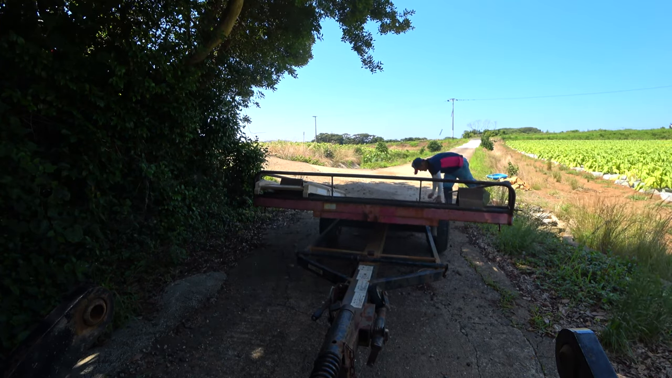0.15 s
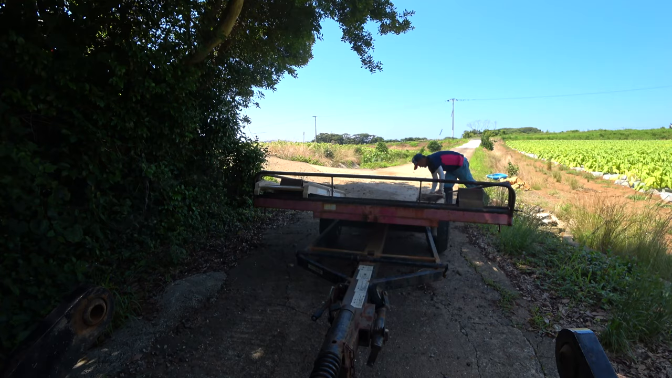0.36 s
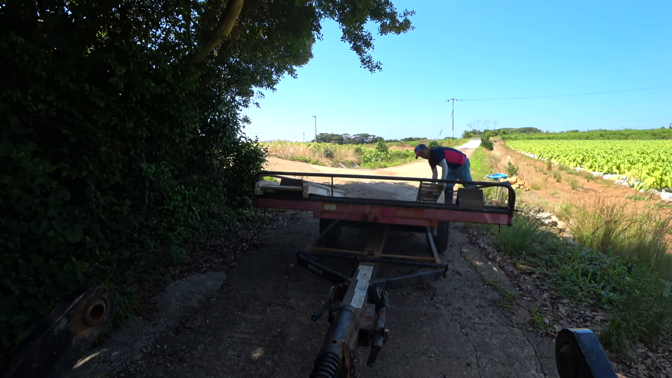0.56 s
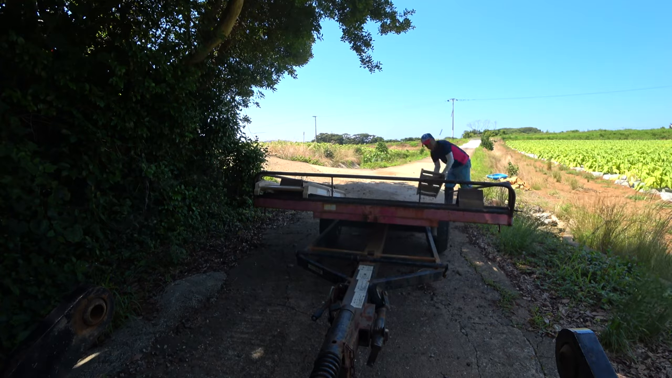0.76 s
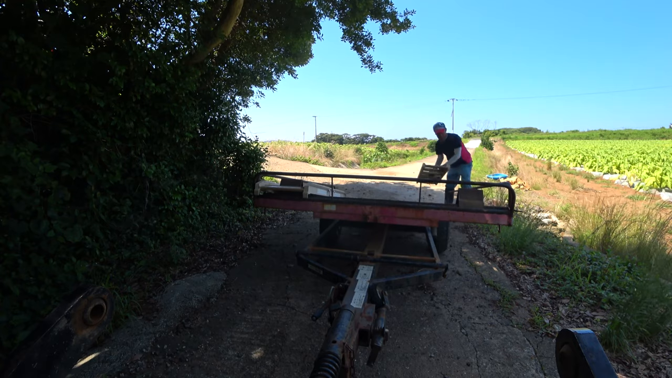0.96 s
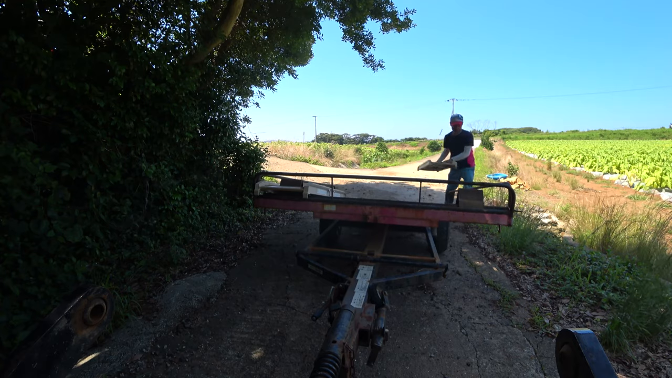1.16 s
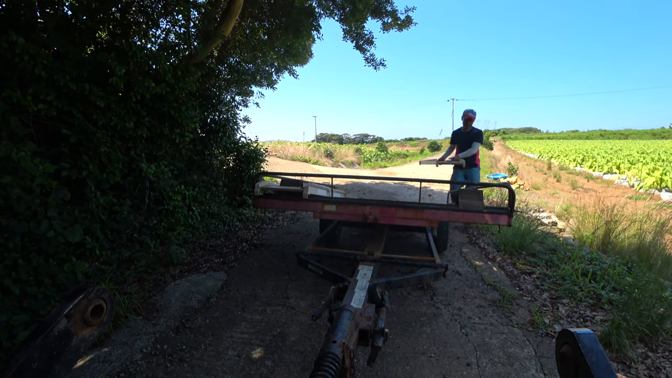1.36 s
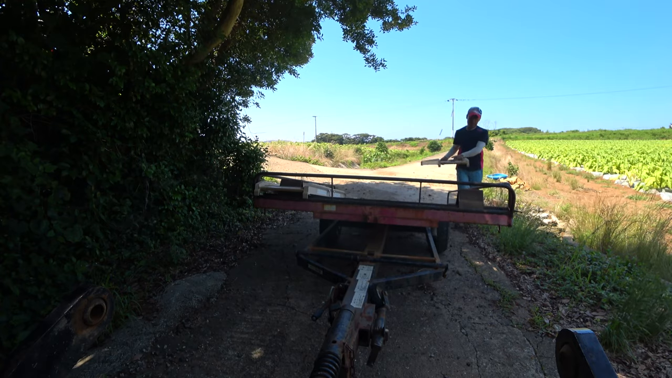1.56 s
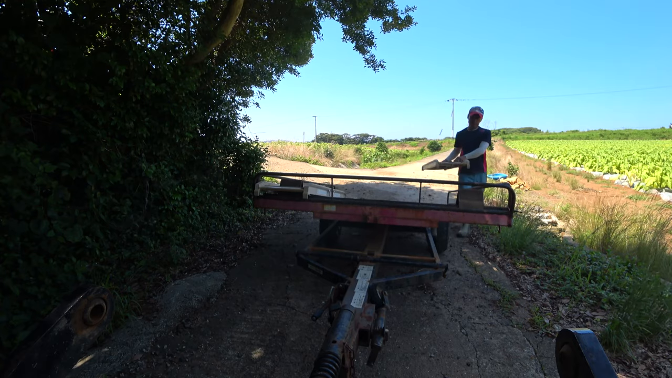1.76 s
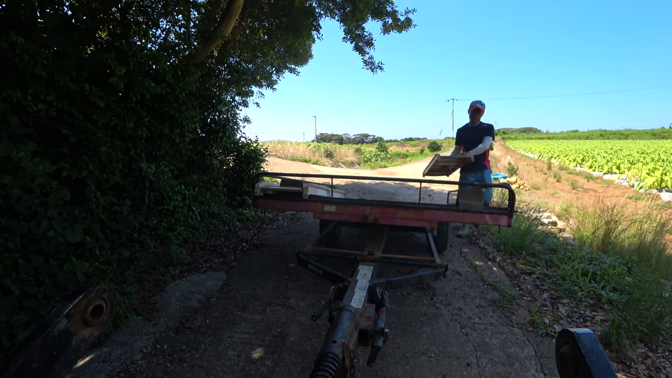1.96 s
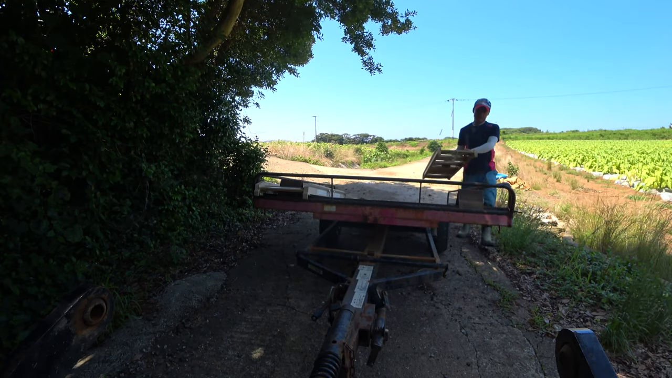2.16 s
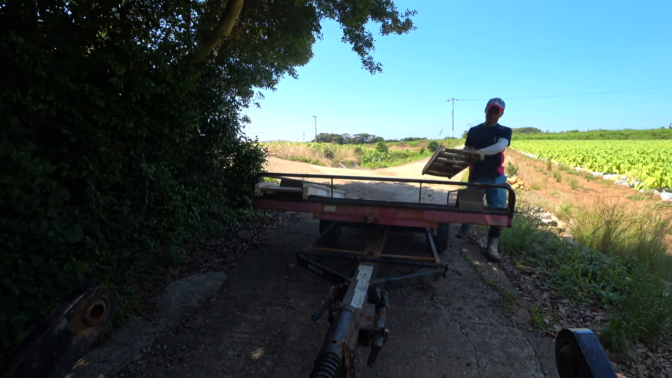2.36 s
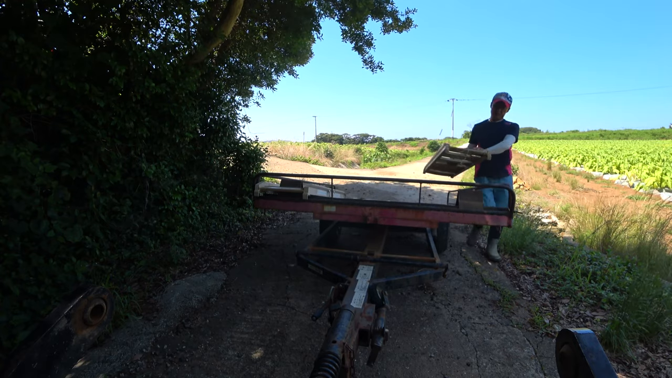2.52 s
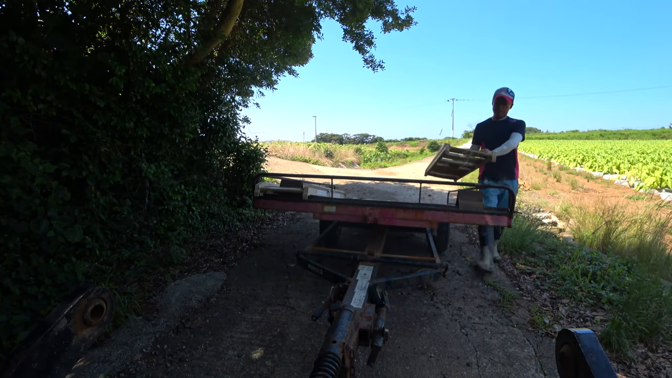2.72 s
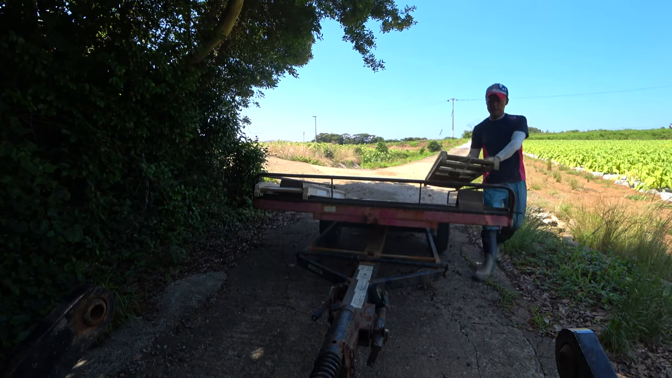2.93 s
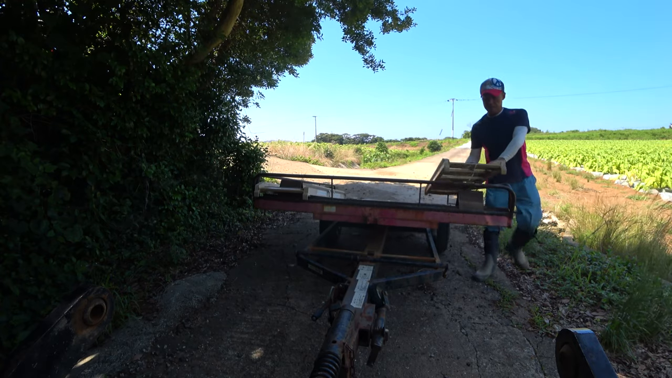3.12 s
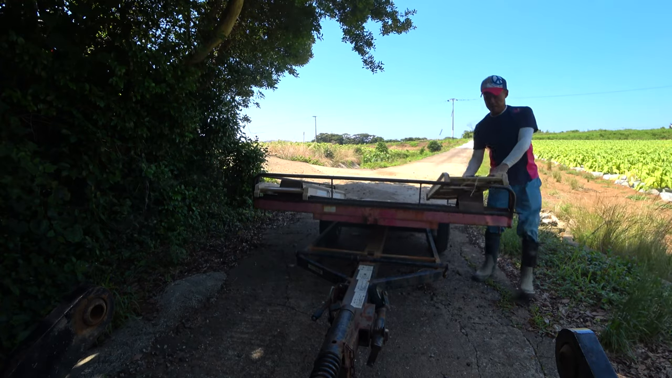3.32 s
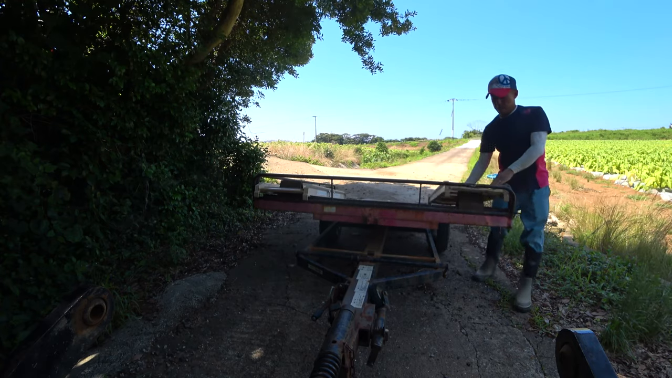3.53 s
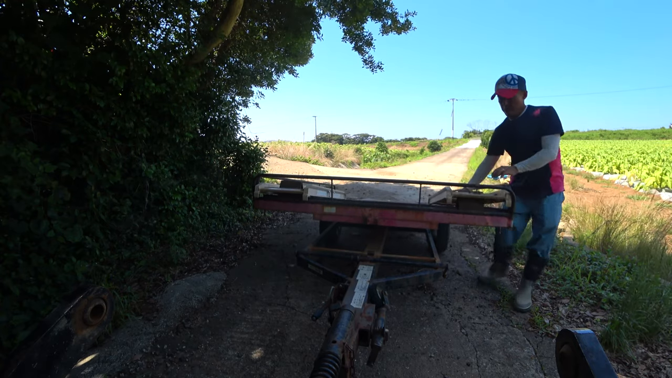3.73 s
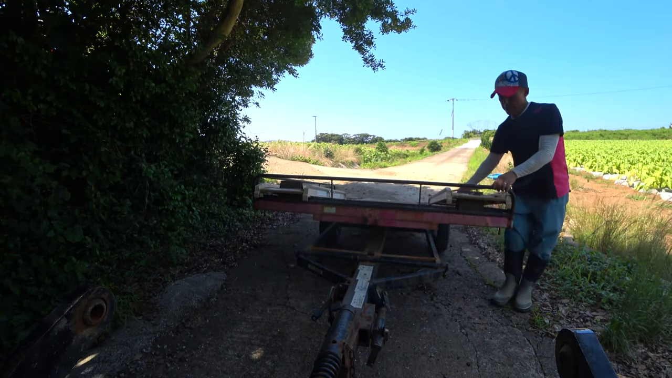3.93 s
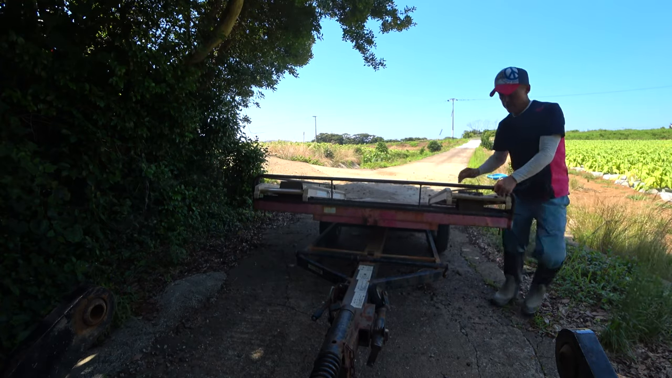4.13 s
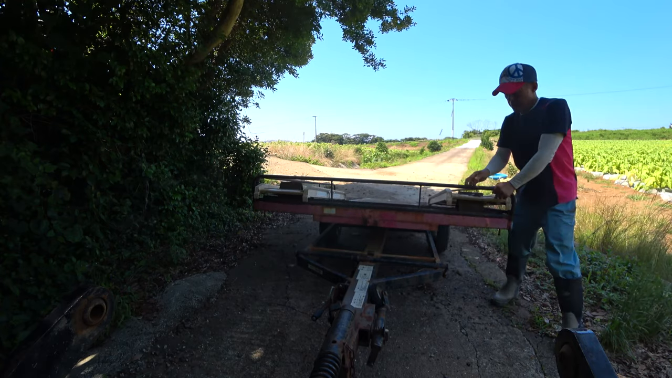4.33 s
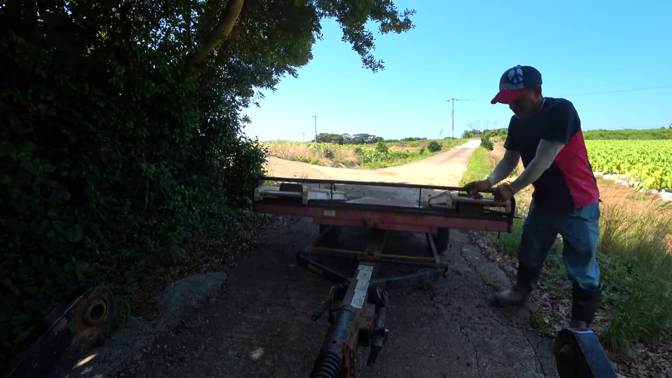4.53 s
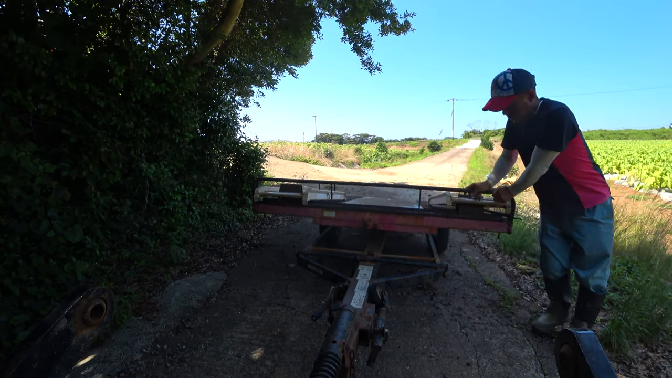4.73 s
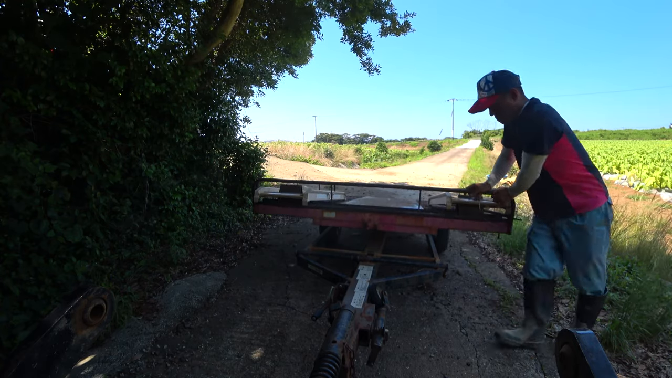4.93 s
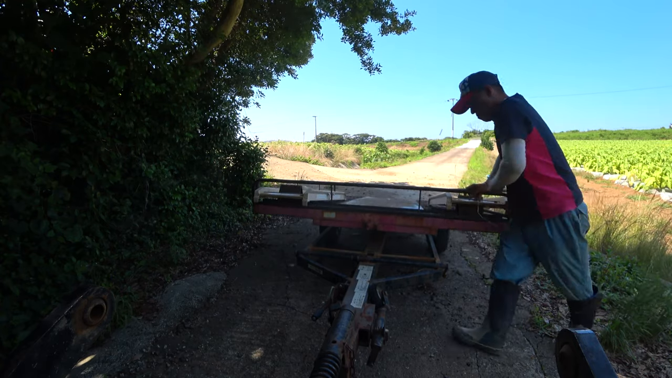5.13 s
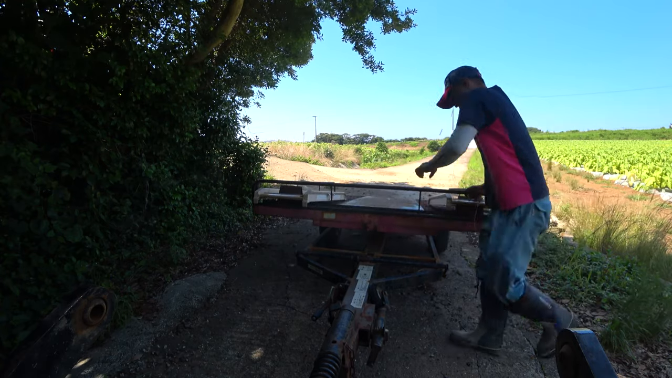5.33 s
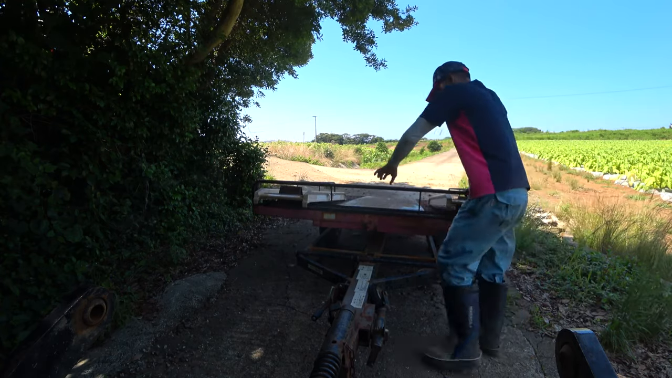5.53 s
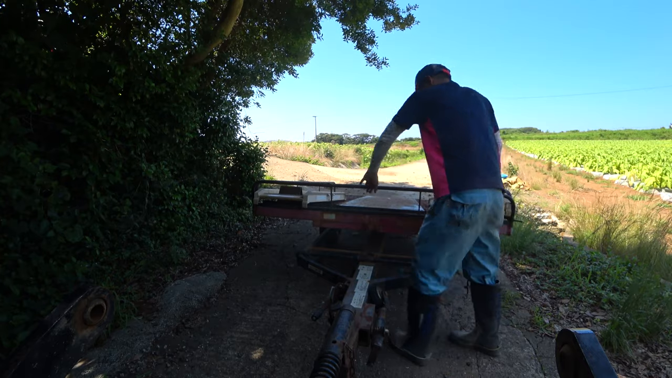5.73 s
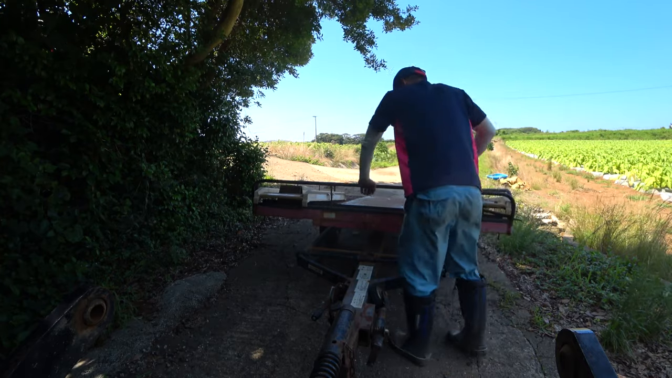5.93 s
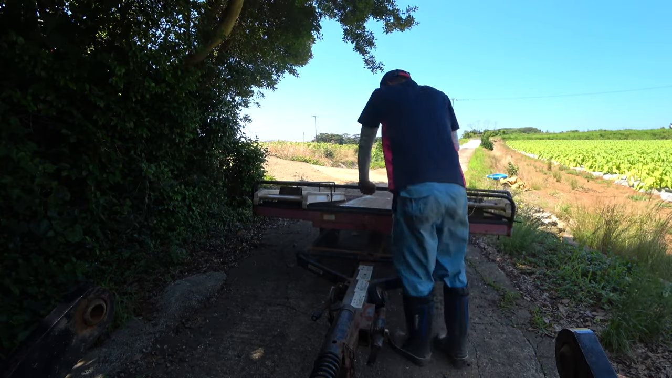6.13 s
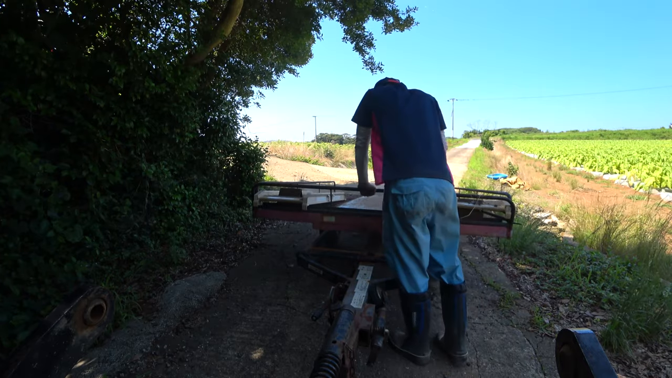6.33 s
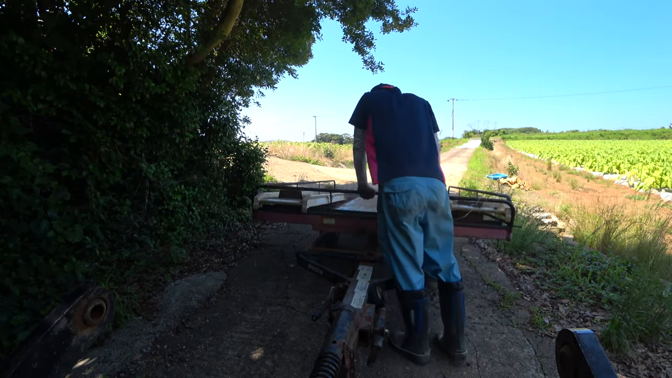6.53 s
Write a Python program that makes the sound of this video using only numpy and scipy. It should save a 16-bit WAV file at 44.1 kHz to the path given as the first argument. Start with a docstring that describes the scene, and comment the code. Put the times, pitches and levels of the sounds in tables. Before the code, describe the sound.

A stereo outdoor microphone by a trailer picks up airy hush and rustling leaves. Wood knocks dully, then clacks hard twice before boots come crunching closer. In the middle a loose pallet lands in a rapid, very loud rattle of blows, booming and cracking on steel with a metallic tail. Afterwards come close footsteps, twig snaps, small wood taps and low wind puffs.

```python
"""Outdoors by a trailer: a slatted wooden pallet is picked up, carried and thrown on the steel bed.
Wood and blows on steel are bursts of coloured noise whose pitches die at different speeds.
The bed rings on as decaying sine waves. Boots crunch leaves and grit in grainy noise bursts.
Behind it: airy noise, rustling leaves, a faint far whine (a sine) and wind pulses on the microphone."""
import sys
import numpy as np
from scipy import signal
from scipy.fft import rfft, irfft, next_fast_len
from scipy.io import wavfile
from scipy.ndimage import map_coordinates

SR = 44100
rng = np.random.default_rng(int(sys.argv[2]) if len(sys.argv) > 2 else 0)


def output_pcm(signal):
    """Save a mono or channel-first signal as 16-bit PCM at the path in sys.argv[1].

    Samples are clipped to [-1, 1] before scaling.
    """
    pcm = np.clip(np.atleast_2d(signal).T, -1, 1) * 32767
    wavfile.write(sys.argv[1], SR, np.round(pcm).astype(np.int16))


N = 289978  # length in samples

# Levels in the tables are before the trims that the functions add.
# Colours of noise. Each row: frequency in Hz, relative strength in dB per Hz.
# Open air, then the flutter of wind on the microphone:
AIR_COLOUR = [(25, -40), (60, -10), (100, -19), (170, -9.5), (290, -5.5), (420, 4), (700, -2.5), (1040, 1),
              (1400, -1), (2100, -0.5), (3500, -2.5), (6200, -6.5), (9000, -15.5), (12000, -20),
              (16000, -18)]
FLUTTER_COLOUR = [(25, -20), (70, 0), (160, 3.5), (400, -3.5), (800, -13), (2000, -37)]
# Dry leaves and coarse grit under a sole, then the snaps and the rustle:
LEAF_COLOUR = [(1500, -44), (4500, 7), (7500, 6.5), (9500, 1.5), (11500, 1.5), (16000, -12)]
STONE_COLOUR = [(300, -1), (1000, 1.5), (2000, 2), (4000, -2), (7000, -54)]
SNAP_COLOUR = [(300, -6.5), (1000, 0), (2500, 0.5), (4800, 4.5), (7500, 4.5), (9500, -0.5), (11500, 2),
               (16000, -17.5)]
# Hollow pallet frame and its hard edge:
FRAME_COLOUR = [(100, -34.5), (290, -32), (350, -7.5), (400, 0.5), (480, -10.5), (540, -10), (640, -21),
                (890, -10.5), (1100, -19.5), (1450, -17), (2000, -31.5), (5000, -58)]
EDGE_COLOUR = [(500, -4.5), (1200, -5), (2300, 8), (4000, 4), (8000, -11.5), (16000, -45)]
# Loose slat, its splintery top and the low ring of its thin board:
SLAT_COLOUR = [(200, -44), (500, -44), (750, -10.5), (1100, -9), (1350, -16), (1650, -15.5), (2050, -1.5),
               (2700, -1), (3500, 6), (4500, 3.5), (5600, 0.5), (8000, -14), (16000, -83)]
SPLINTER_COLOUR = [(2000, -30), (4500, 1.5), (7500, 0.5), (9500, -7), (11500, -8), (13000, -21),
                   (16000, -21)]
BOARD_COLOUR = [(500, -18), (750, -4), (1400, 0), (2200, -7), (3500, -15)]
# Boom and crack of a blow on the bed, and the wide steel plate it shakes:
BOOM_COLOUR = [(40, -47), (130, -52), (210, -19), (300, -37), (380, -1.5), (550, -1.5), (800, 5.5),
               (1150, 0), (1400, 5), (2200, -3), (3500, -23), (8000, -54)]
CRACK_COLOUR = [(800, -28), (2200, 5.5), (3000, 5), (4000, 4), (4900, 5.5), (5800, -1), (7400, -2),
                (8500, -8), (11500, -8.5), (13500, -21), (16000, -29)]
PLATE_COLOUR = [(40, -42), (110, -60), (200, -10), (290, -21), (400, 4), (620, -10.5), (830, -1),
                (1100, -9.5), (1350, 1.5), (2500, -21), (7000, -39), (16000, -39)]

# How fast each body goes quiet. Each row: frequency in Hz, time to fall by 60 dB in seconds.
FRAME_DECAY = [(400, 0.2), (1500, 0.26), (8000, .08)]
EDGE_DECAY = [(1500, 0.26), (8000, 0.032)]
SLAT_DECAY = [(1300, 0.34), (4000, 0.22), (12000, 0.19)]
BLOW_DECAY = [(400, 0.52), (1500, 0.25), (5000, 0.27), (12000, 0.35)]
PLATE_DECAY = [(200, 2.47), (450, 1.45), (1400, 0.74), (6000, 0.84)]

# Bending resonances of a slat. Each row: frequency in Hz, width in Hz, level in dB.
SLAT_MODES = [(1130, 14, -52), (1296, 7, 19), (1355, 140, 8), (2040, 620, 10.5), (2600, 67, 18),
              (3000, 50, -10)]
# Ringing pitches of the steel bed, then of the side rail.
# Each row: frequency in Hz, level in dB, time to fall by 60 dB in seconds.
BED_MODES = [(195, -40, 1.2), (219, -34, .8), (389, -12, .22), (463, -32, 1.1), (498, -24, .35),
             (603, -24, .3), (662, -26, .25), (769, -23, .3), (812, -25, .5), (943, -24, .4),
             (1055, -27, .25), (1335, -32, .45), (1379, -26, .25), (1587, -13, .15), (1811, -26, .15),
             (2015, -25, .2), (3222, -28, .15), (3833, -24, .15), (4770, -27, .15), (7498, -28, .15)]
RAIL_MODES = [(910, -32, 4.2), (6309, -20, .58), (6950, -41, .5), (10416, -25.5, .45), (11880, -30, .35)]

# Puffs of wind on the microphone. Each row: time in seconds, level in dB.
GUSTS = [(1.092, -51), (1.21, -53), (1.319, -28), (1.394, -36), (1.631, -45), (2.253, -38.5), (2.308, -35),
         (2.371, -20), (2.497, -22), (4.424, -30.5), (4.618, -24), (5.185, -21), (5.821, -31), (5.878, -38),
         (6.109, -29.5), (6.228, -23), (6.29, -14), (6.309, -6), (6.319, -7.5), (6.356, -17.5),
         (6.425, -23.5), (6.561, -28)]
# Footfalls. Each row: time of full weight in seconds, scuffing before it in seconds,
# rolling on after it in seconds, level in dB, coarse grit relative to the leaves in dB.
STEPS = [(2.457, .1, .03, -10.5, -2.5), (2.995, 0, 0, -13.5, -15), (3.055, 0, .02, -8.5, -28),
         (3.565, .075, 0, -12.5, -6), (4.177, 0, .03, -16.5, 1.5), (4.287, 0, 0, -17, -6),
         (4.426, 0, .09, -5, -4), (4.579, 0, .06, -8, -11), (5.167, 0, .03, -14, -2),
         (5.39, 0, 0, -27.5, 2), (5.664, 0, 0, -23, 6), (5.692, 0, .08, -15.5, 0), (5.855, 0, 0, -14, -5),
         (6.128, 0, .03, -14, 1.5)]
# Single twigs and stones snapping. Each row: time in seconds, level in dB.
SNAPS = [(1.8951, -7.5), (2.149, -18.5), (2.458, -21), (2.87, -10.5), (2.8865, -12), (2.9796, -9.5),
         (2.998, -20), (3.043, -13.5), (3.0771, -15.5), (4.1006, -14), (4.56, -17), (4.579, -2.5),
         (4.632, -9), (4.726, -14.5), (4.798, -9.5), (4.8727, -16.5), (5.1295, -16), (5.145, -21),
         (5.1991, -7.5), (5.667, -7.5), (5.6717, -13.5), (5.694, -10), (5.7469, -9.5), (5.7677, -10.5),
         (6.0324, -18.5), (6.062, -20), (6.2735, -27)]
# Knocks of the frame. Each row: start in seconds, level in dB, edge relative to the knock in dB.
KNOCKS = [(0.253, -27.5, -6), (0.282, -24, -1.5), (0.505, -25.5, -29), (0.562, -22, -14), (1.601, -42, -8),
          (1.797, -31, 4), (1.894, -34, 6), (2.143, -39, 4), (2.837, -24, 8), (2.87, -28.5, 12.5),
          (4.1, -25.5, 5), (4.929, -33.5, -31), (5.13, -20, 0), (5.175, -23.5, 6.5), (5.695, -31, 8),
          (5.767, -27.5, -8), (5.813, -28, -5)]
# Clacks of loose slats. Each row: start in seconds, level in dB,
# sharpness in dB (edge-on above 0, flat below), rise in seconds.
SLAT_CLACKS = [(0.895, -24.5, 1, 0.00071), (0.944, -23, 4, .0015), (1.089, -19, 13, 0.00087),
               (1.132, -17, 4, 0.0025), (1.157, -19.5, 12, 0.0018), (1.253, -26, 3, .003),
               (1.67, 3, 11.5, 0.011), (1.798, -15.5, 4, .003), (1.819, -8.5, 7.5, 0.0044),
               (1.896, -8.5, 0, 0.011), (1.965, -1.5, 1.5, 0.0012), (2.749, -26, -12, 0.01),
               (2.838, -18, 21, 0.0094), (3.177, -31.5, -7.5, 0.0015), (5.129, -13.5, -5, 0.002),
               (5.319, -31, -6.5, 0.00073), (5.582, -29, -7.5, 0.0015), (5.697, -28.5, -9, .003),
               (5.765, -22, -1, .004), (5.936, -22, -3, 0.0026), (6.122, -20, -7, 0.014),
               (6.273, -22.5, -4.5, 0.00042)]
# Landings of the pallet. Each row: start in seconds, length of juddering in seconds,
# time between blows in seconds, level in dB, crack relative to the blow in dB, push into the steel in dB.
LANDINGS = [(3.584, 0.057, 0.012, -2, -3, -7), (3.667, 0.17, .024, -2.5, 2, -5),
            (3.845, 0.097, .024, -2.5, 0, -16.5)]

WHINE_DB = -57
RUSTLE_GRAIN_DB = 4  # size scatter of the grains in rustling leaves
# Stirred leaves: level under a footfall, time to settle in seconds, level between steps
STIR_DB, STIR_S, IDLE_DB = -37.5, 0.18, -56
# A weaker eddy near each puff: level relative to the puff, spread in time in seconds
WAKE_DB, WAKE_S = -18.5, .018
# A light breeze gets up: start in seconds, eddies per second, their level
BREEZE_FROM_S, BREEZE_PER_S, BREEZE_DB = 1.8, 16, -70
# A rolling sole: bursts per second, level relative to the footfall, its scatter
ROLL_PER_S, ROLL_DB, ROLL_SCATTER_DB = 36, -6, 1
ROLL_FADE_DB_PER_S = 58  # bursts weaken away from the moment of full weight
# Time for a crunch to fall by 60 dB; left minus right, so the walker is a little to the right
CRUNCH_T60, WALKER_PAN_DB = 0.14, -1.6
# Splintery top of a middling clack, its growth per dB of sharpness and per dB of strength
TOP_DB, TOP_PER_SHARPNESS, TOP_PER_STRENGTH = -15.5, 0.64, 0.4
# Level of a middling clack; ring of its board relative to the clack
MIDDLING_DB, BOARD_DB = -21.5, -12
# As the pallet settles flat: fading of the crack, growth of the boom,
# time for its weight to come onto the steel in seconds, unevenness of the blows in seconds
CRACK_FADE_DB, BOOM_GROWS_DB, SETTLE_S, UNEVEN_S = 15, 0.5, 0.02, .002
PORT_PHASE = .4  # radians by which one microphone port leads and the other lags on the steel's ring
TOP_HZ = 15900  # nothing is kept from here up


def amp(db):
    """Turn decibels into a gain."""
    return 10 ** (np.asarray(db) / 20)


def unit(x):
    """Scale a sound to an average (rms) level of 1."""
    return x / np.sqrt(np.mean(x ** 2) + 1e-20)


def along(points, hz):
    """Read a table of (Hz, value) points, joined by straight lines on a log frequency axis."""
    f, v = np.transpose(points)
    return np.interp(np.log(hz + 1), np.log(f + 1), v)


def seconds(size):
    """The time of each sample in seconds."""
    return np.arange(size) / SR


def wobble(rate):
    """A smooth random curve through `rate` random points a second."""
    knots = rng.standard_normal(int(N * rate / SR) + 4)
    return map_coordinates(knots, [seconds(N) * rate])


def add(track, s, sound):
    """Mix a sound into a stereo track at s seconds."""
    start = max(round(s * SR), 0)
    part = track[:, start:][:, :sound.shape[-1]]
    part += sound[..., :part.shape[1]]


def noise(spectrum, size, side_db, spiky_db=0, colour=lambda hz: 1):
    """Coloured stereo noise of rms 1; spiky_db breaks it into grains of unequal size."""
    m = next_fast_len(size)
    hz = np.fft.rfftfreq(m, 1 / SR)
    # each grain lasts 16 samples
    grains = np.repeat(amp(spiky_db * rng.standard_normal(m // 16 + 1)), 16)[:m]
    white = rng.standard_normal((2, m)) * grains
    shape = amp(along(spectrum, hz)) * colour(hz)
    mid, side = irfft(rfft(white) * shape, m)[:, :size]
    width = amp(side_db) * side
    return unit(np.array([mid + width, mid - width]))


def crowded_modes(hz, spacing_hz=55, uneven_db=4):
    """The point of contact favours some ringing pitches of a body and starves others."""
    favour = rng.standard_normal(size=1024)
    return amp(uneven_db * map_coordinates(favour, [hz / spacing_hz], mode="wrap"))


def struck(spectrum, t60, rise, side_db, modes=crowded_modes, chatter_db=3, size=16384):
    """One chattering blow on a body: each frequency dies at its own speed."""
    blow = noise(spectrum, size, side_db, chatter_db, modes)
    hz, t, z = signal.stft(blow, SR, nperseg=256)
    decay = amp(-60 * t / along(t60, hz)[:, None])
    ring = signal.istft(z * decay, SR, nperseg=256)[1][:, :size]
    return ring * (1 - np.exp(-(seconds(size) / rise) ** 2))


def stirred_leaves(t):
    """Level of the rustle in dB: it swells around every footfall and settles again."""
    power = amp(IDLE_DB) ** 2
    for s, _, _, db, _ in STEPS:
        power = power + amp(db + STIR_DB) ** 2 * np.exp(-2 * np.abs(t - s) / STIR_S)
    return 10 * np.log10(power)


def outdoors(air_db=-46.0, whine_hz=2121):
    """Open air and rustling leaves are wavering noise; the faint far whine is a wavering sine."""
    t = seconds(N)
    air = amp(air_db + 0.15 * wobble(4.4)) * noise(AIR_COLOUR, N, side_db=-2.5)
    leaves = noise(SNAP_COLOUR, N, side_db=-9.0, spiky_db=RUSTLE_GRAIN_DB)
    rustle = amp(stirred_leaves(t) + 3.8 * wobble(22.08)) * leaves
    whine = amp(WHINE_DB + 2 * wobble(5)) * np.sin(2 * np.pi * whine_hz * t + wobble(30))
    return air + rustle + whine


def eddies(scatter_db=3):
    """List the puffs, a weaker eddy near each, and the faint eddies of the breeze."""
    wakes = [(s + WAKE_S * rng.standard_normal(), db + WAKE_DB) for s, db in GUSTS]
    breeze = []
    for s in np.arange(BREEZE_FROM_S, N / SR, 1 / BREEZE_PER_S):
        late = rng.random() / BREEZE_PER_S / 2
        breeze.append((s + late, BREEZE_DB + scatter_db * rng.standard_normal()))
    return list(GUSTS) + wakes + breeze


def puffs(pitch_hz=440, sharpen=0.32, flutter_s=0.02, snap_hz=1500, snap_db=-4):
    """An eddy sucks briefly at the microphone ports, the harder the sharper, amid a short low flutter."""
    out, t = np.zeros((2, N)), seconds(size=8820) - .1
    for s, db in eddies():
        # pitch_hz holds for an eddy of -10 dB; harder ones are higher
        eddy_hz = pitch_hz * amp(db + 10) ** sharpen
        u = (np.pi * eddy_hz * (t - .002)) ** 2
        v = (np.pi * snap_hz * (t - .0017)) ** 2
        suck = amp(db) * (2 * u - 1) * np.exp(-u)
        # doubling the dB leaves a clear click only on the hardest eddies
        click = amp(2 * db + snap_db) * (2 * v - 1) * np.exp(-v)
        stir = noise(FLUTTER_COLOUR, len(t), side_db=-1)
        flutter = amp(0.44 * db - 24.5) * np.exp(-(t / flutter_s) ** 2) * stir
        uneven_sides = amp(rng.normal(0, 1, (2, 1)))
        add(out, s + t[0], (suck + click) * uneven_sides + flutter)
    return out


def crunches():
    """One burst as the weight comes down, more while the sole scuffs in and rolls on."""
    bursts = []
    for s, before, after, db, grit_db in STEPS:
        bursts.append((s, db, grit_db))
        for k, (slip, size) in zip(range(-8, 9), rng.standard_normal((17, 2))):
            if k and -before <= k / ROLL_PER_S <= after:
                fade_db = ROLL_FADE_DB_PER_S * abs(k) / ROLL_PER_S
                roll_db = db + ROLL_DB - fade_db + ROLL_SCATTER_DB * size
                bursts.append((s + (k + slip / 10) / ROLL_PER_S, roll_db, grit_db))
    return bursts


def boots(rise=0.0034, snap_t60=0.0066, scatter_db=-21, scatter_t60=0.43):
    """Soles crush leaves and grit in bursts of grains; single snaps scatter off the trailer and hedge."""
    out, t = np.zeros((2, N)), seconds(size=16384)
    placed = amp([[WALKER_PAN_DB / 2], [-WALKER_PAN_DB / 2]])
    press = (1 - np.exp(-t / rise)) * amp(-60 * t / CRUNCH_T60)
    for s, db, grit_db in crunches():
        leaves = noise(LEAF_COLOUR, len(t), side_db=-10.0, spiky_db=4.0, colour=crowded_modes)
        stones = noise(STONE_COLOUR, len(t), side_db=-8, spiky_db=8.5, colour=crowded_modes)
        add(out, s, amp(db - 13.5) * placed * press * (leaves + amp(grit_db) * stones))
    # a very short snap and its weaker, longer scatter
    snap = amp(-60 * t / snap_t60) + amp(scatter_db - 60 * t / scatter_t60)
    for s, db in SNAPS:
        grains = noise(SNAP_COLOUR, len(t), side_db=-9)
        add(out, s + 0.00053, amp(db - 8) * placed * snap * grains)
    return out


def slat_modes(hz):
    """A thin board answers most strongly near its bending resonances."""
    total = 0
    for k, (fc, width, db) in enumerate(SLAT_MODES):
        resonance = hz * width / (fc ** 2 - hz ** 2 + 1j * hz * width)
        total = total + amp(db) * resonance * (-1) ** k  # neighbours have opposite signs
    return np.abs(total)


def clacks():
    """Hard, edge-on clacks splinter at the top; flat ones ring the board."""
    listed = []
    for s, db, sharp_db, rise in SLAT_CLACKS:
        top_db = TOP_DB + TOP_PER_SHARPNESS * sharp_db + TOP_PER_STRENGTH * (db - MIDDLING_DB)
        listed.append((s, db, top_db, BOARD_DB - sharp_db, rise))
    return listed


def pallet():
    """The frame knocks hollowly and the loose slats clack against each other."""
    out = np.zeros((2, N))
    for s, db, edge_db in KNOCKS:
        frame = struck(FRAME_COLOUR, FRAME_DECAY, rise=0.0018, side_db=-10.0)
        edge = struck(EDGE_COLOUR, EDGE_DECAY, rise=0.00013, side_db=-9)
        add(out, s, amp(db - 3.5) * frame + amp(db + edge_db - 10.5) * edge)
    for s, db, top_db, ring_db, rise in clacks():
        slat = struck(SLAT_COLOUR, SLAT_DECAY, rise, side_db=-11.5)
        splinter = struck(SPLINTER_COLOUR, SLAT_DECAY, rise, side_db=-10)
        board = struck(BOARD_COLOUR, SLAT_DECAY, rise, side_db=-7, modes=slat_modes)
        add(out, s, amp(db - 13.0) * slat)
        add(out, s, amp(db + top_db - 7.5) * splinter)
        add(out, s, amp(db + ring_db - 6) * board)
    return out


def judder():
    """Each landing is a run of uneven blows: first a cracking edge, then ever more weight on the steel."""
    strikes = []
    for s, length, gap, db, crack_db, push_db in LANDINGS:
        for age, slip in zip(np.arange(0, length, gap), rng.standard_normal(size=16)):
            flat = (age / length) ** 2
            weight = 1 - np.exp(-(age + gap / 10) / SETTLE_S)
            start = s + age + UNEVEN_S * slip * (age > 0)  # the first blow is on time
            boom_db = db + BOOM_GROWS_DB * flat
            edge_db = crack_db - CRACK_FADE_DB * flat
            strikes.append((start, boom_db, edge_db, push_db + 20 * np.log10(weight)))
    return strikes


def bed_ring(strikes, waver=0.81, bed_db=-1.0):
    """Each steel mode stores the energy of the blows and lets it go slowly; the last blow rings the rail."""
    blows, out, t = np.zeros(N), np.zeros((2, N)), seconds(N)
    for s, _, _, push_db in strikes:
        blows[round(s * SR)] = amp(push_db) ** 2
    start = np.flatnonzero(blows)[0]
    ports = PORT_PHASE * np.array([[1], [-1]])
    for hz, db, t60 in BED_MODES:
        kept = amp(-60 / (t60 * SR)) ** 2  # share of the energy left after one sample
        energy = signal.lfilter([1], [1, -kept], blows[start:])
        # the shifting load bends the pitch a little
        phase = 2 * np.pi * hz * t[start:] + waver * wobble(25)[start:]
        swell = np.sqrt(2 * energy / energy.max())
        out[:, start:] += amp(db + bed_db) * swell * np.sin(phase + ports)
    for hz, db, t60 in RAIL_MODES:
        add(out, strikes[-1][0], amp(db - 60 * t / t60) * np.sin(2 * np.pi * hz * t + ports))
    return out


def steel_modes(hz):
    """The steel's pitches are more unevenly favoured than those of wood."""
    return crowded_modes(hz, spacing_hz=40.27, uneven_db=6.5)


def crash(strikes):
    """The pallet lands, bounces and judders over the steel; every blow also shakes the wide plate."""
    out = np.zeros((2, N))
    for s, db, crack_db, _ in strikes:
        boom = struck(BOOM_COLOUR, BLOW_DECAY, rise=0.0015, side_db=-10.0, modes=steel_modes)
        crack = struck(CRACK_COLOUR, BLOW_DECAY, rise=0.0006, side_db=-11, modes=steel_modes)
        plate = struck(PLATE_COLOUR, PLATE_DECAY, rise=0.0048, side_db=-15, size=65536)
        add(out, s, amp(db - 9) * boom)
        add(out, s, amp(db + crack_db - 5.5) * crack)
        add(out, s, amp(db - 25) * plate)
    return out


def scene():
    """Everything as it reaches the microphone."""
    strikes = judder()
    background = outdoors() + puffs()
    return background + boots() + pallet() + bed_ring(strikes) + crash(strikes)


def record(dry, top=0.98, hardness=5, low_cut_hz=70):
    """Round off the loudest peaks, thin the deep bass and keep only what lies below TOP_HZ."""
    held = dry / (1 + np.abs(dry / top) ** hardness) ** (1 / hardness)
    m = next_fast_len(N + 8192)
    hz = np.fft.rfftfreq(m, 1 / SR)
    bass_cut = 1j * hz / (low_cut_hz + 1j * hz)
    return irfft(rfft(held, m) * bass_cut * (hz < TOP_HZ), m)[:, :N]


dry = scene()
out = record(dry)
output_pcm(out)
```